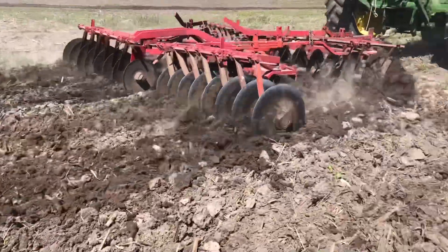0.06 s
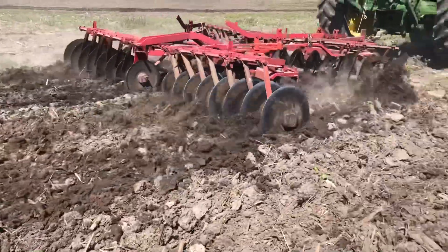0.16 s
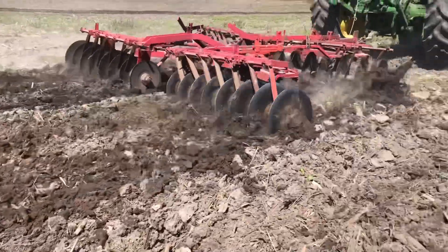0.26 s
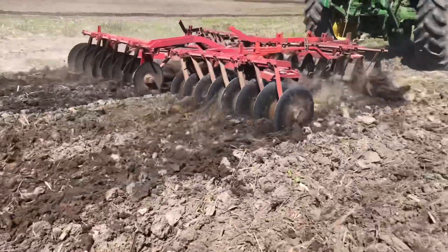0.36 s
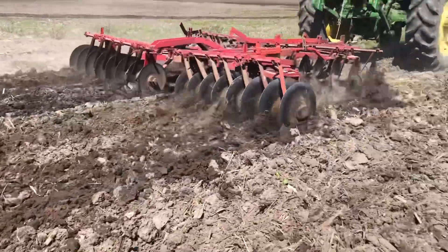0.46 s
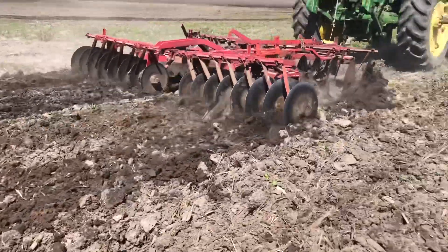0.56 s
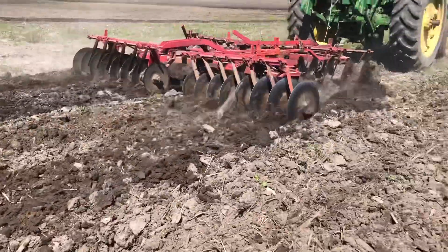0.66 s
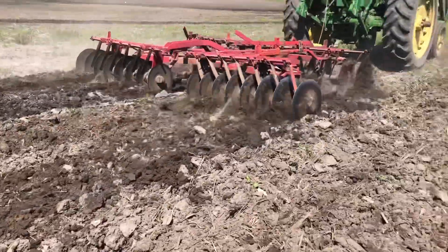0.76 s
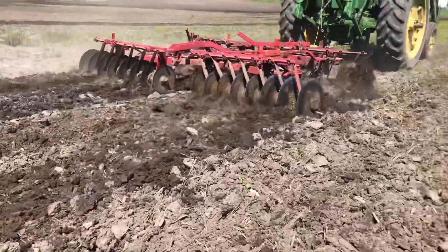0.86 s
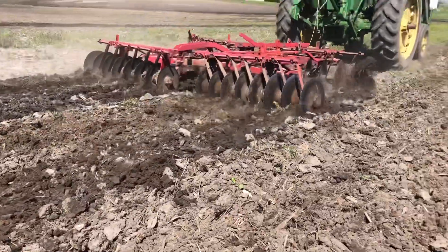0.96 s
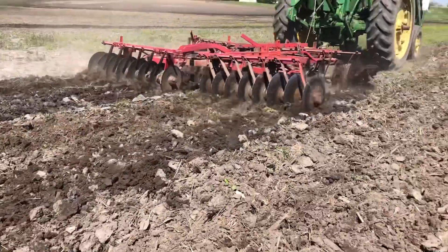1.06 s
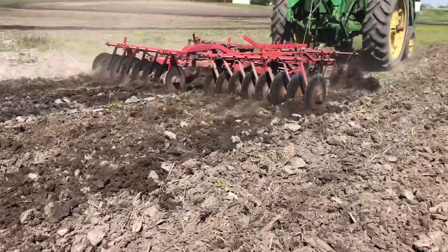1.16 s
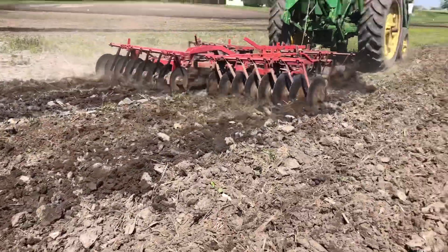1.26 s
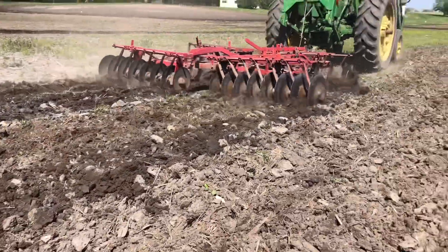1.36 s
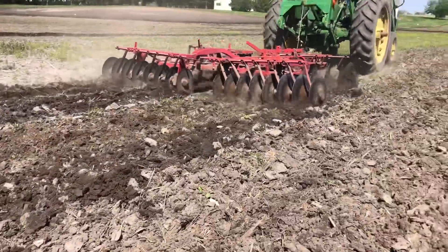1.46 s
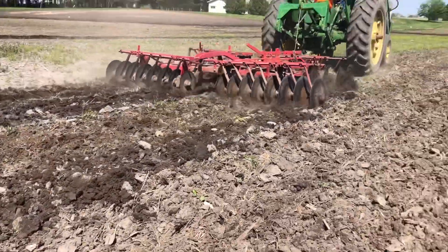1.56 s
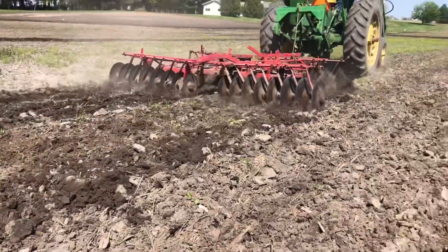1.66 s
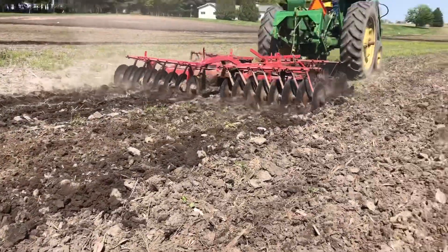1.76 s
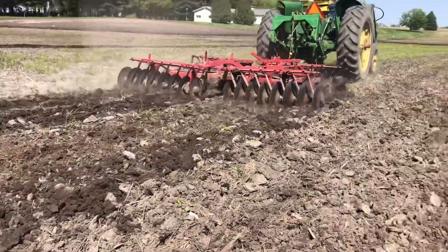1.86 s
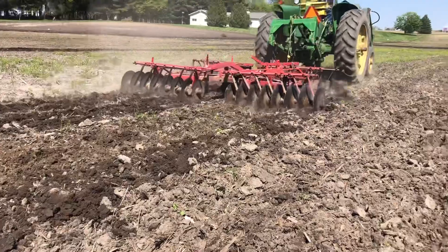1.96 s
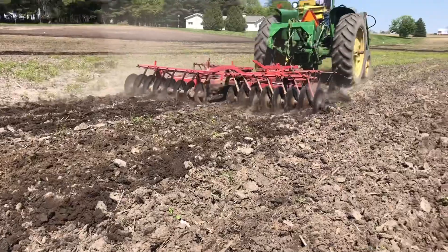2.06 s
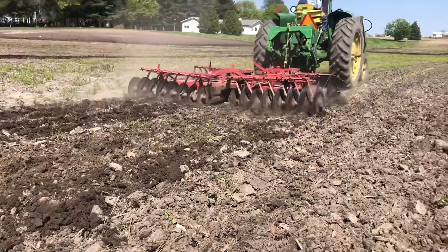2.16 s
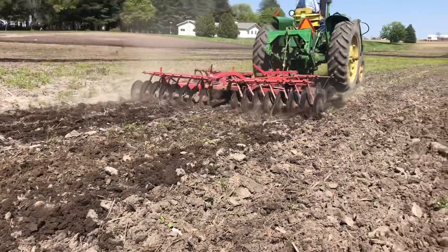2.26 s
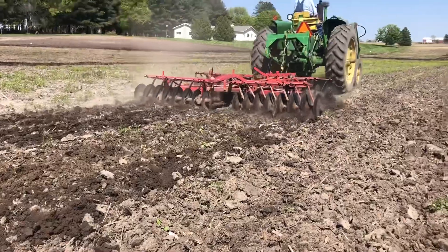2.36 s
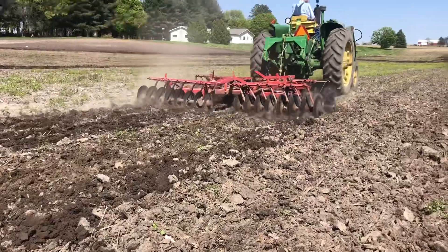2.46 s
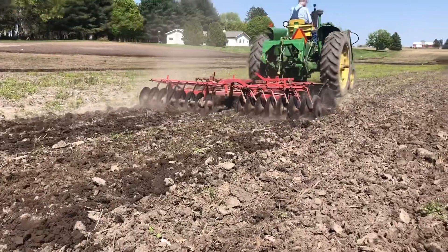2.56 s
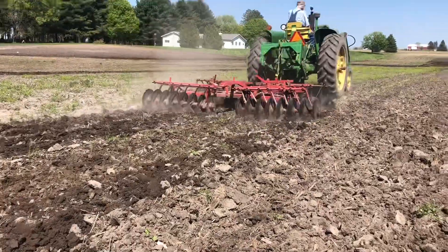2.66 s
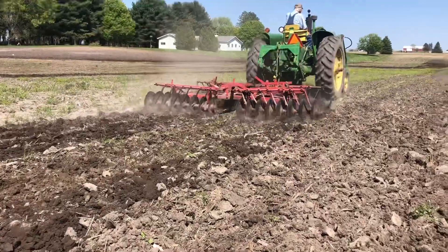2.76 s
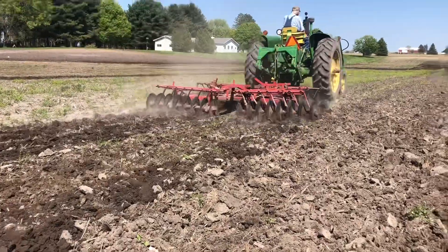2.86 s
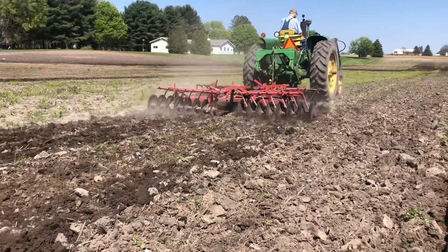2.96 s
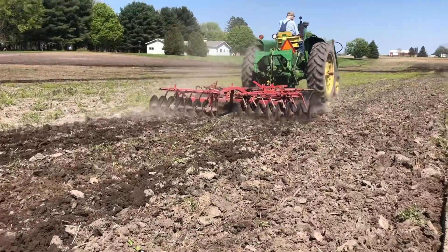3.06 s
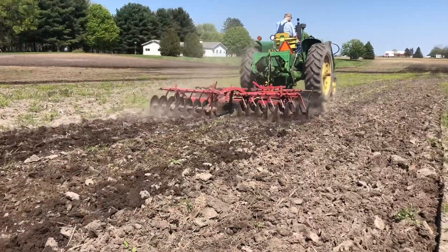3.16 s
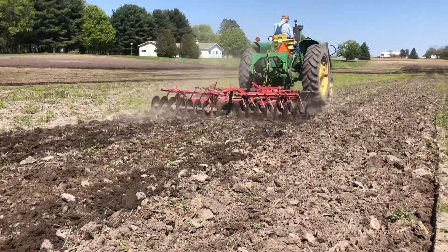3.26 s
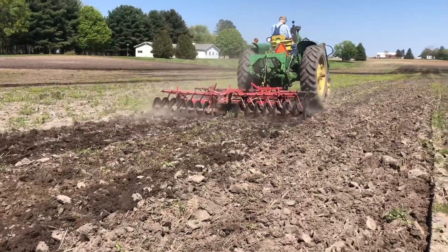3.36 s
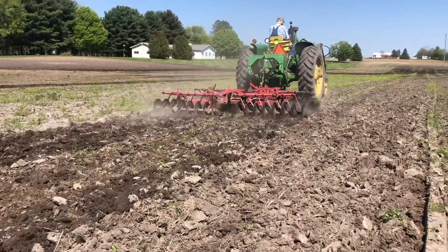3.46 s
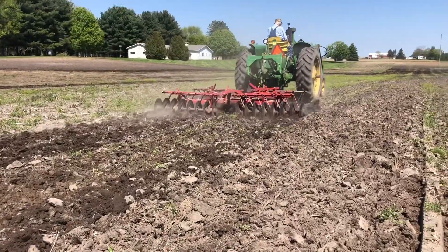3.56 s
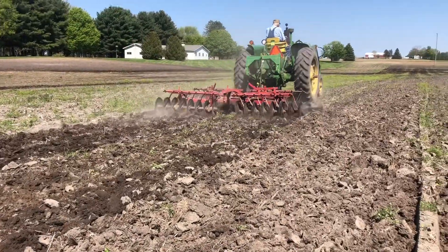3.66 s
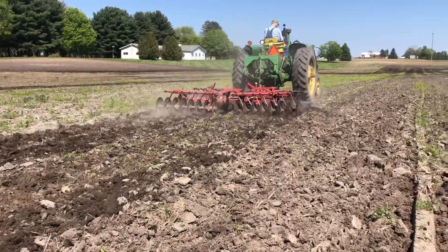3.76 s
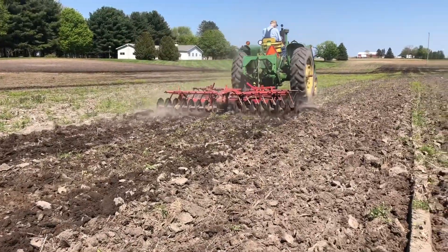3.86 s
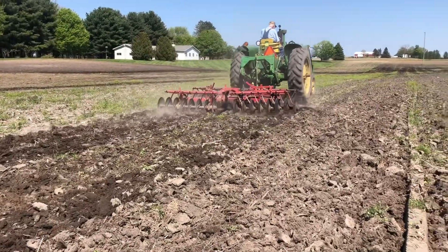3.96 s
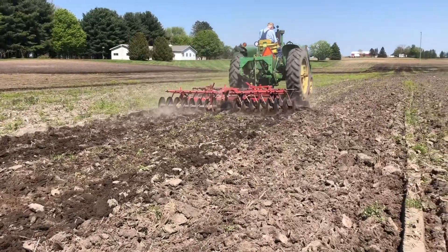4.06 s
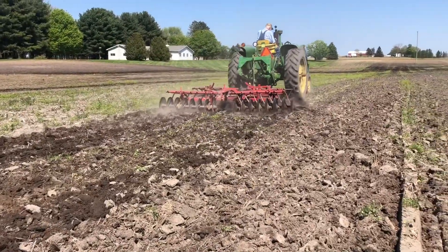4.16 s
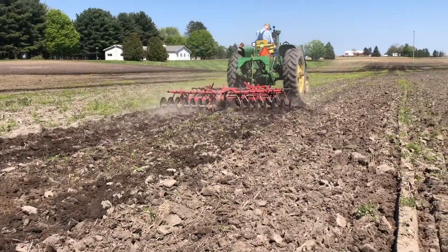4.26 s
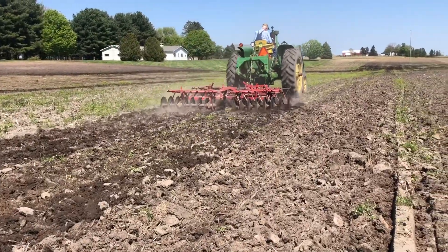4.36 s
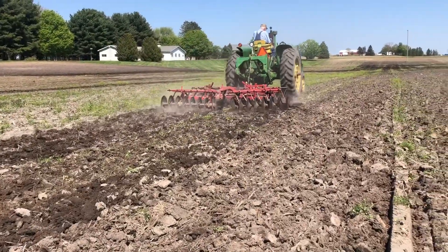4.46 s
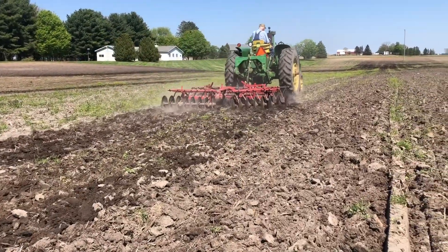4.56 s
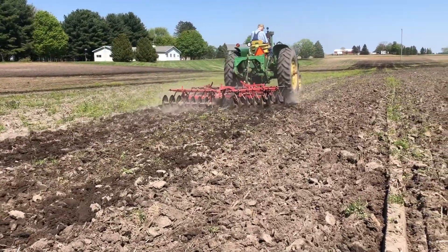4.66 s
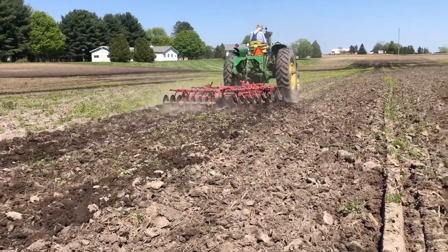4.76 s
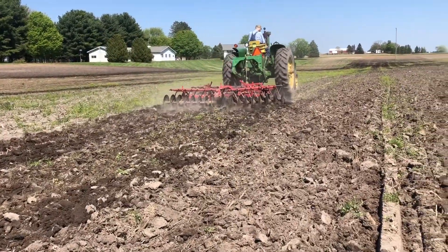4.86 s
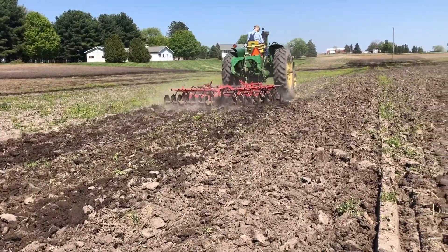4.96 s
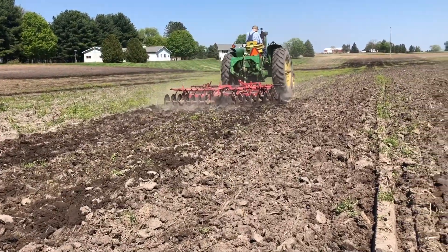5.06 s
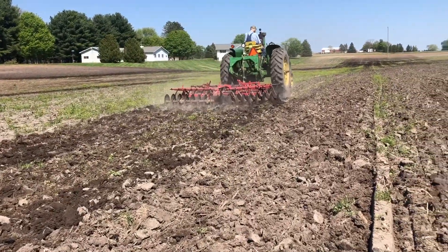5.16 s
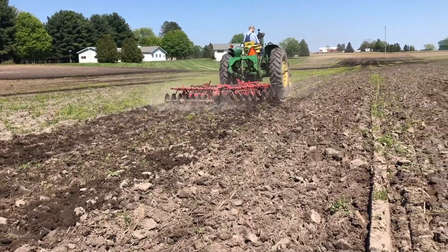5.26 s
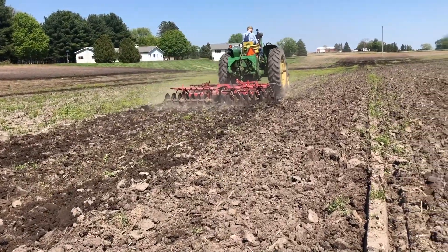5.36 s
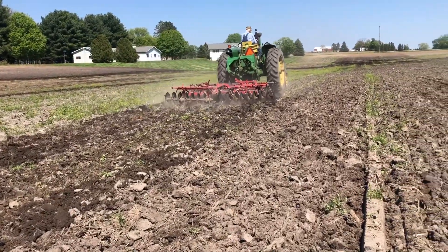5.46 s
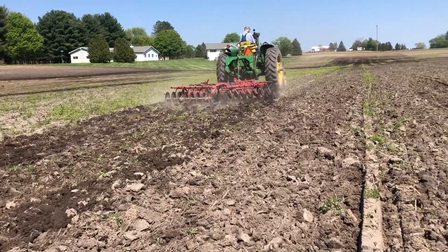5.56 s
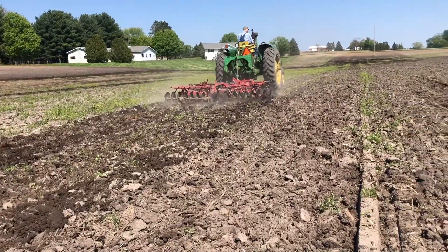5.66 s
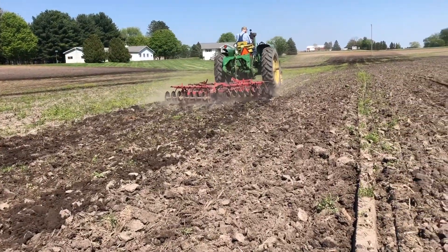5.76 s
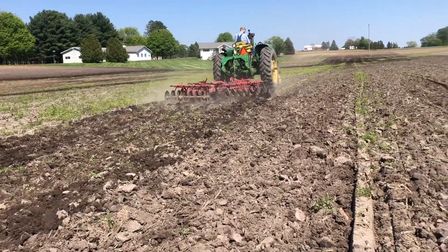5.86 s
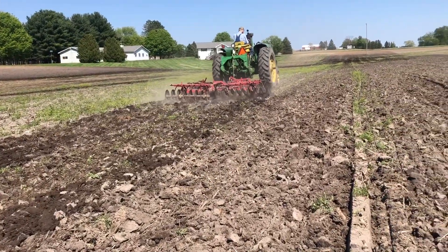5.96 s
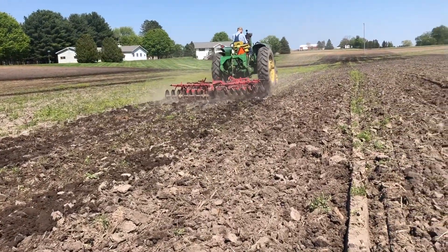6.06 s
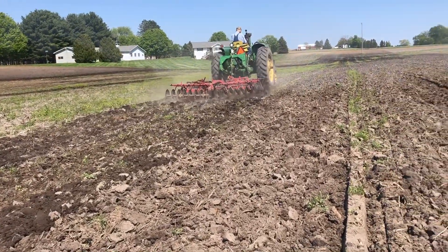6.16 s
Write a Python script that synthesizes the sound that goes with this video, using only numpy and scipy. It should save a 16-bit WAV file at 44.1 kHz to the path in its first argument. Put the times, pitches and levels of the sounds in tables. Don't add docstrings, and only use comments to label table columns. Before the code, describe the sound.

Close at first, then receding: a throbbing diesel exhaust drone with a broad gritty roar and dry soil hiss. Pebbles tick and stones snap on steel discs, with occasional bright clangs and soft thumps. Midway a dry bearing chirps, later a loose disc clatters irregularly. Near the end the soil hiss swells, and small metal tinkles beside the phone microphone in the open field.

```python
import sys
import numpy as np
from scipy import signal
from scipy.fft import rfft, irfft
from scipy.io import wavfile
from scipy.ndimage import uniform_filter1d

SR = 44100
rng = np.random.default_rng(int(sys.argv[2]) if len(sys.argv) > 2 else 0)


def decibels_to_gain(level_db):
    exponent = np.asarray(level_db, float) / 20
    return 10 ** exponent


def bounce(signal):
    frames = np.transpose(np.atleast_2d(signal))
    limited = np.clip(frames, -1, 1)
    pcm = np.round(limited * 32767).astype(np.int16)
    wavfile.write(sys.argv[1], SR, pcm)


N = 273861
T = np.arange(N) / SR
CLANG_CYCLES = 95


def unit(x):
    return x / np.sqrt(np.mean(x ** 2))


def colour(x, points):
    hz, db = np.transpose(points)
    log_hz = np.log(np.maximum(np.arange(N // 2 + 1) * SR / N, 1))
    gain = decibels_to_gain(np.interp(log_hz, np.log(hz), db, left=-90, right=-90))
    return unit(irfft(rfft(x) * gain, N))


def walk(rate):
    hold = int(SR / rate)
    steps = np.repeat(rng.standard_normal(N // hold + 1), hold)
    return unit(uniform_filter1d(uniform_filter1d(steps, hold), hold)[:N])


def ring(x, hz, t60):
    r = np.exp(-np.log(1000) / (max(t60, .001) * SR))
    w = 2 * np.pi * hz / SR
    return signal.lfilter([0, np.sin(w)], [1, -2 * r * np.cos(w), r * r], x)


def grit(rate, spread_db):
    chance = rng.random((3, N))
    size = decibels_to_gain(spread_db * np.minimum(-np.log(1 - chance[2]), 4))
    return (chance[0] < rate / SR) * np.sign(chance[1] - .5) * size


def add(out, at, sound):
    i = int(at * SR)
    out[i:i + len(sound)] += sound[:N - i]


def receding(db, fall, lag_s=0.):
    pass_m, speed_m_s, nearest_s = 4.64, 2.38, 0.02
    distance_m = np.hypot(pass_m, speed_m_s * (T - nearest_s - lag_s))
    return decibels_to_gain(db) * (distance_m / pass_m) ** -fall


def knocks(table, cycles):
    out, t = np.zeros(N), T[:16384]
    for at, db, hz in table:
        push = 1 - np.exp(-t * hz / 2)
        add(out, at, decibels_to_gain(db) * push * decibels_to_gain(-60 * t * hz / cycles) * np.sin(2 * np.pi * hz * t))
    return out


def soil(turn):
    # f/Hz, level/dB
    hiss_spectrum = [(2650, -6), (4500, -4.5), (5900, -4.5), (9120, -5), (12700, -10.5), (15000, -10.5),
                     (16000, -12)]
    swell_s, swell_db, swell_rise_s = 5.85, 3.5, 0.092
    knock = 1 + .12 * np.exp(3 * (np.cos(turn - 1.7) - 1))
    ticks = np.abs(grit(70, spread_db=3.5))
    crumbs = unit(signal.lfilter([1], [1, -np.exp(-1 / (.0018 * SR))], ticks))
    flicker = decibels_to_gain(.7 * walk(14) + .9 * walk(45)) * knock + .29 * crumbs
    swell = swell_db / (1 + np.exp((swell_s - T) / swell_rise_s))
    return receding(-36.5 + swell, 0.9) * colour(rng.standard_normal(N) * flicker, hiss_spectrum)


def roar(turn, far):
    # f/Hz, level per Hz/dB
    near_spectrum = [(330, -10), (367, -9.5), (504, 5), (900, -2.5), (1240, -11.5), (1420, 1.5),
                     (1770, -9.5), (2180, -4), (2450, -3.5), (3000, -13.5), (3400, -5.5), (3950, -12),
                     (4300, -7), (5200, -20.5), (7000, -62)]
    # f/Hz, level per Hz/dB
    far_spectrum = [(330, -6.5), (380, -9.5), (500, -3.5), (726, -2), (1010, -5.5), (1280, -8.5),
                    (1500, -3.5), (1750, -14.5), (2100, -6.5), (3000, -9.5), (3400, -7.5), (3950, -12),
                    (4300, -11), (5200, -19), (7000, -24.5)]
    # f/Hz, level close by/dB, level far off/dB, t60/s
    disc_modes = [(507, -3, -7.5, 0.096), (655, 0, -4.5, 0.23), (719, -11, -1.5, 0.19), (936, -25, -14, .3),
                  (972, -3, -13, 0.65), (1030, -6.5, -1, 0.43), (1150, 0.5, -2.5, 0.042),
                  (1400, 1, -21, .14), (1500, -11, 0, 0.1), (1587, -9, -3, 0.18), (1635, -3.5, -2.5, 0.15),
                  (1835, -5, -2.5, 0.089), (1986, -6, -3, 0.047), (2140, 1.5, -4.5, 0.15),
                  (2206, 2, -10, 0.1), (2586, -12, -6, 0.12), (2677, 4.5, -20, 0.05),
                  (2780, -6, -18, 0.088), (3284, 3.5, -3.5, 0.016), (3470, -9, -8, 0.06)]
    roar_db, harrow_lag_s = -32.5, 0.27
    floor_share = 0.22
    throb = 1 + .05 * np.cos(turn) + .05 * np.cos(4 * turn)
    air = rng.standard_normal(N) * throb * decibels_to_gain(.8 * walk(9))
    body = (1 - far) * colour(air, near_spectrum) + far * colour(air, far_spectrum)
    discs = 0
    for hz, near_db, far_db, t60 in disc_modes:
        level = decibels_to_gain(near_db + far * (far_db - near_db) + 1.2 * walk(4))
        discs = discs + level * unit(ring(grit(500, spread_db=2.5), hz, t60))
    level = receding(roar_db, 0.98, harrow_lag_s) + floor_share * decibels_to_gain(roar_db)
    return level * (body + decibels_to_gain(-12.5) * discs)


def jolts():
    # t/s, peak/dB, f/Hz
    thumps = [
        (.03, -51, 120),
        (.53, -28, 108),
        (1.2, -34, 205),
        (6.12, -34, 298),
        (6.155, -29.5, 336),
        (6.19, -29, 290),
    ]
    return knocks(thumps, cycles=27)


def scrapes():
    # t/s, length/s, level/dB, centre f/Hz
    drags = [(0.34, 0.033, -46, 4440), (0.674, 0.026, -39, 4000), (1.69, 0.02, -33, 3060),
             (1.72, 0.027, -38.5, 3430), (1.791, 0.012, -30.5, 2400), (1.799, 0.03, -35.5, 2300),
             (1.999, 0.027, -37.5, 2920), (2.586, 0.035, -45, 4500), (3.124, 0.011, -45, 4700),
             (4.416, 0.015, -37.5, 3370), (3.85, .008, -39, 5000), (5.392, 0.012, -48.5, 7000),
             (5.53, 0.0088, -49, 8000), (5.618, 0.028, -44, 3960), (5.948, 0.0091, -46, 8200)]
    out = np.zeros(N)
    ragged = rng.standard_normal(N) * decibels_to_gain(2.5 * walk(300))
    for at, length, db, hz in drags:
        band = signal.butter(2, [hz / 1.9, hz * 1.9], "band", fs=SR, output="sos")
        t = T[:4096] / length
        shape = np.minimum(8 * t, 1) * np.exp(-t ** 3)
        add(out, at, decibels_to_gain(db + 12) * shape * signal.sosfilt(band, ragged[int(at * SR):][:4096]))
    return out


def squeak():
    # centre t/s, level/dB, half length/s
    catches = [
        (3.549, -33, 0.004),
        (3.58, -46, 0.035),
        (3.592, -29.5, 0.011),
    ]
    pitch_hz, rise_hz_s, late_s = 4220, 500, 0.006

    def swell(late):
        return sum(decibels_to_gain(db) * np.exp(-((T - at - late * min(half / .012, 1)) / half) ** 2)
                   for at, db, half in catches)

    hz = pitch_hz + rise_hz_s * np.clip(T - catches[-1][0], 0, .05)
    phase = 2 * np.pi * np.cumsum(hz * (1 + 0.0042 * walk(210))) / SR
    cage = decibels_to_gain(-14 + 3 * walk(200)) * np.sin(1.115 * phase)
    tone = np.sin(phase) + cage
    overtones = decibels_to_gain(-9) * np.sin(2 * phase) + decibels_to_gain(-18) * np.sin(3 * phase)
    return np.sqrt(2) * (swell(0) * tone + swell(late_s) * overtones)


def clangs():
    # t/s, peak/dB, f/Hz
    struck = [
        (.68, -25, 1360),
        (1.807, -22, 2200),
        (2.09, -26, 1830),
        (2.593, -22, 4080),
        (2.608, -20, 3850),
        (4.09, -32, 1876),
    ]
    return knocks(struck, CLANG_CYCLES)


def loose_disc():
    # t/s, peak/dB
    blows = [(4.47, -35), (4.52, -38), (4.624, -31), (4.69, -37), (4.765, -29.5), (4.84, -31), (5.182, -22),
             (5.225, -31), (5.255, -26), (5.4, -35), (5.465, -29)]
    pitched = [(at, db, 1495 * (1 + 0.018 * rng.standard_normal())) for at, db in blows]
    return knocks(pitched, CLANG_CYCLES)


def pebbles():
    count, crowd = 36, 1.7
    u = rng.random((count, 4))
    at = T[-1] * ((np.arange(count) + u[:, 0]) / count) ** crowd
    peak_db = -22 - 1.0 * at - 7 * u[:, 1]
    ring_hz = 4500 + 4000 * u[:, 2]
    return list(zip(at, peak_db, ring_hz, -8 - 8 * u[:, 3]))


def stones():
    # t/s, peak/dB, ring f/Hz, gritty tail/dB
    hits = [(0.054, -17.5, 8100, -7), (0.3408, -12.5, 4570, -2), (0.679, -22, 4650, -12),
            (1.0316, -17, 4640, -6), (1.137, -17, 5780, -13), (1.3095, -17.5, 8000, -7),
            (1.3488, -16, 5400, -11), (1.3747, -17.5, 7700, -15), (1.6265, -8.5, 5760, -22),
            (1.691, -18, 5600, -16), (1.7105, -12.5, 5000, -7), (2.0497, -21, 5650, -18),
            (2.2082, -17, 4920, -12), (2.594, -16, 5130, -5), (2.613, -21, 9200, -7),
            (3.1173, -7, 5200, -7.5), (3.244, -8, 5270, -16), (3.3062, -8.5, 5330, -7),
            (3.7287, -17, 4840, -10), (3.771, -11.5, 7060, -15), (3.8566, -20, 8100, -8),
            (3.927, -18, 6500, -3), (4.249, -20.5, 6400, 0), (4.4796, -21.5, 8300, -12),
            (4.575, -20.5, 7000, -19), (4.5104, -16, 5900, -8), (5.0542, -17, 6400, -6),
            (5.6155, -20, 9700, -15), (5.8745, -21.5, 9300, -17), (5.901, -20, 6800, -9)]
    out, t = np.zeros(N), T[:2048]
    steep = signal.butter(2, 2600, "high", fs=SR, output="sos")
    bright = signal.butter(2, [5500, 11500], "band", fs=SR, output="sos")
    fade = 60 * t / 0.044
    for at, db, hz, tail_db in hits + pebbles():
        noise = rng.standard_normal(2048)
        snap = (noise + 3 * (t == 0)) * np.exp(-t / .0003)
        dull = signal.sosfilt(steep, ring(snap + noise * decibels_to_gain(tail_db - fade), hz, .0006))
        crack = signal.sosfilt(bright, snap + noise * decibels_to_gain(tail_db - 2 * fade))
        both = dull / np.abs(dull).max() + decibels_to_gain(-7) * crack / np.abs(crack).max()
        add(out, at, decibels_to_gain(db + 0.5) * both)
    return out


def jingle():
    # f/Hz, level/dB, t60/s
    fitting_modes = [
        (5800, -8, 0.027),
        (6298, -6, .03),
        (9720, -0.5, .035),
        (12400, -6, .03),
        (14030, -2.5, .035),
        (14520, -7, .045),
        (14810, -7, .04),
    ]
    # t/s, level/dB, lowest mode stirred f/Hz
    shakes = [
        (6.035, -54, 14198),
        (6.063, -56, 9000),
        (6.104, -42, 0),
        (6.15, -45, 0),
        (6.17, -45, 0),
        (6.195, -47, 5),
    ]
    out, t = np.zeros(N), T[:8192]
    for at, db, low_hz in shakes:
        shake = rng.standard_normal(8192) * np.exp(-t / 0.009)
        modes = sum(decibels_to_gain(g - 9.0) * ring(shake, hz, t60) for hz, g, t60 in fitting_modes if hz > low_hz)
        rattle = decibels_to_gain(5.0) * np.diff(shake, prepend=0)
        add(out, at, decibels_to_gain(db) * (modes + rattle))
    return out


def exhaust(turn):
    # multiple of the cycle, level/dB
    orders = [(1, -41), (2, -41), (3, -35), (4, -9), (5, -16), (6, -27), (7, -19), (8, 0), (9, -14),
              (10, -19), (11, -11), (12, -4), (13, -14.5), (14, -26), (15, -24), (16, -26)]
    cylinder_lead = (0, 3.7, .7, .7)
    # f/Hz, level/dB
    fan_lines = [(51, -28), (65, -27), (76, -25), (91, -26), (162.5, -16), (258, -31)]
    # f/Hz, level per Hz/dB
    rumble_spectrum = [(20, -22), (33, -12), (44, -18), (62, -2), (120, -1.5), (190, -3), (215, -1),
                       (250, -7), (300, -8), (350, -35), (420, -36)]
    ease_s, ease_db, ease_rise_s = 6.2, -5, 0.03
    drone = 0
    for k, db in orders[3:]:
        if k % 4 == 0:
            lag = np.pi if k == 4 else 0
            sway_db, slip = .8, .07
        else:
            lag = .6 * k - cylinder_lead[int(k) % 4] + np.pi * (k == 7)
            sway_db, slip = 1.6, .25 + .12 * max(k - 13, 0)
            db = db - .7
        drone = drone + decibels_to_gain(db + sway_db * walk(9.3)) * np.cos(k * turn - lag + slip * walk(7.3))
    fan = sum(decibels_to_gain(db + 2.5 * walk(3.4)) * np.cos(2 * np.pi * hz * T + 0.6 * walk(5.4))
              for hz, db in fan_lines)
    rumble = decibels_to_gain(-16.2 + .8 * walk(5)) * colour(rng.standard_normal(N), rumble_spectrum)
    ease = ease_db / (1 + np.exp((ease_s - T) / ease_rise_s))
    return receding(-17 + ease, 0.52) * (unit(drone + fan) + rumble)


def scene():
    # t/s, f/Hz
    cycle_rate = [(0, 14.33), (1.5, 14.29), (2.2, 14.22), (2.8, 14.3), (3.3, 14.19), (4, 14.28),
                  (4.5, 14.2), (5.5, 14.27), (6.21, 14.25)]
    cycle_hz = np.interp(T, *np.transpose(cycle_rate))
    turn = 2 * np.pi * np.cumsum(cycle_hz * (1 + 0.0039 * walk(8))) / SR
    far = np.clip(T / 3.3, 0, 1)
    ground = soil(turn) + roar(turn, far) + jolts() + scrapes()
    steel = squeak() + clangs() + loose_disc() + stones()
    return (ground + steel + jingle() + exhaust(turn))[None]


def roll_off(x):
    return signal.sosfilt(signal.butter(12, 17040, fs=SR, output="sos"), x)


def record(dry):
    dry = signal.sosfilt(signal.butter(2, 25, "high", fs=SR, output="sos"), dry)
    dry = signal.sosfilt(signal.ellip(10, .2, 38, 15850, fs=SR, output="sos"), dry)
    return roll_off(dry)


dry = scene()
out = record(dry)
bounce(out)
```